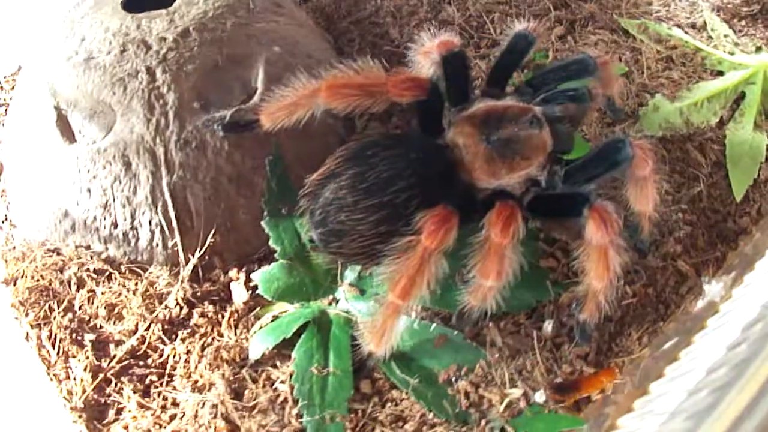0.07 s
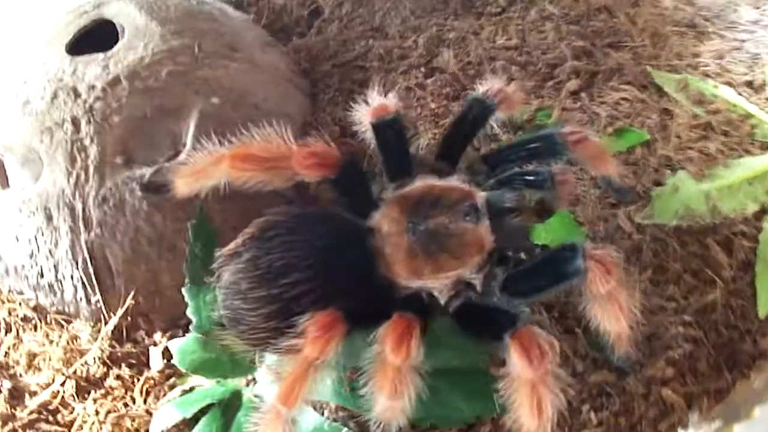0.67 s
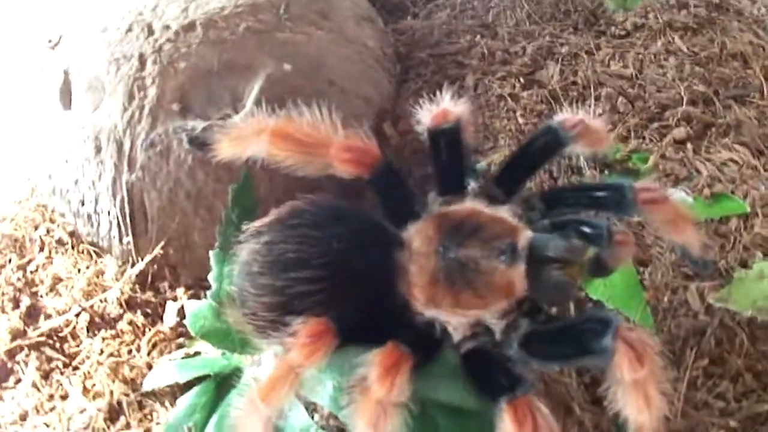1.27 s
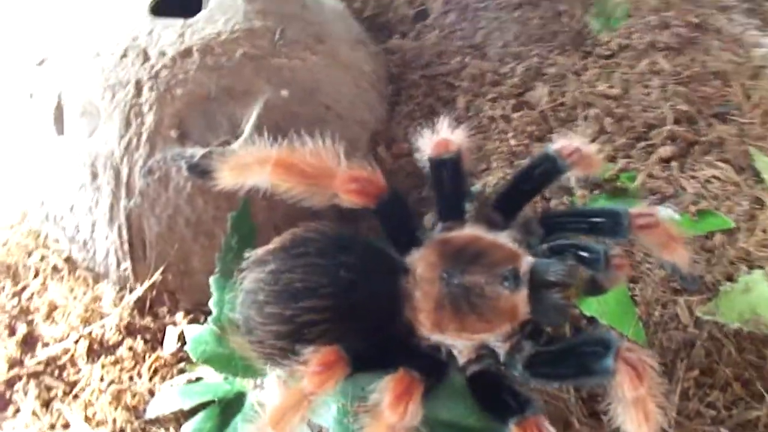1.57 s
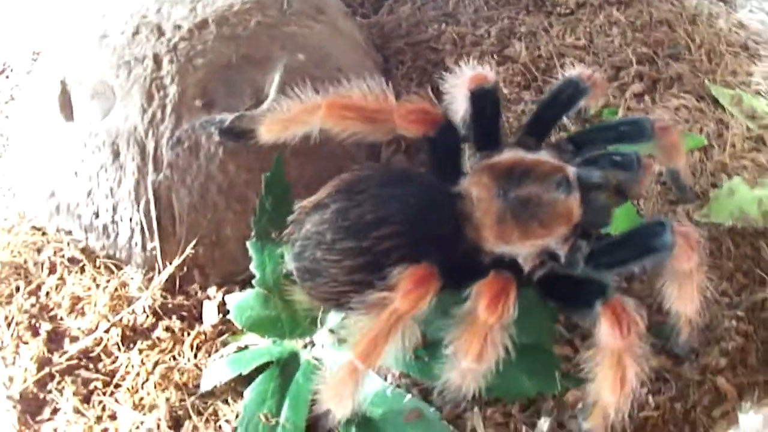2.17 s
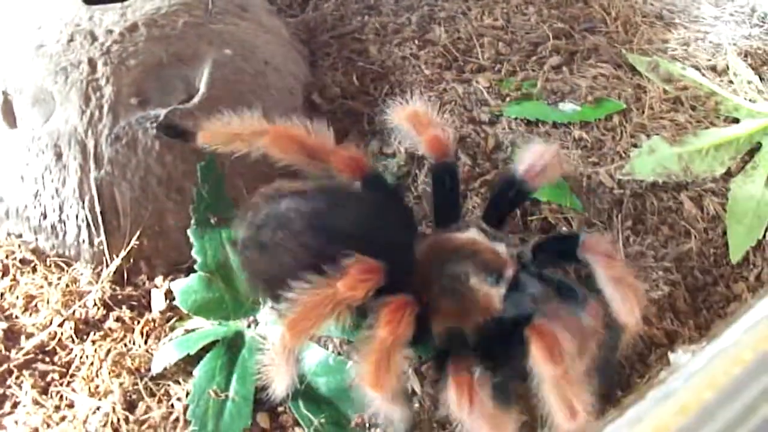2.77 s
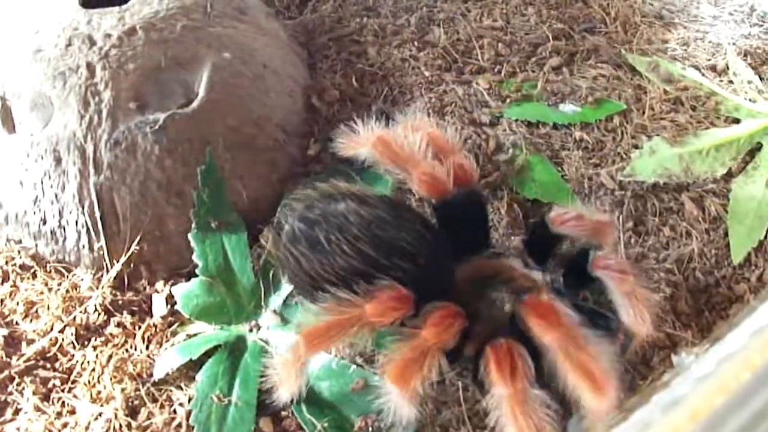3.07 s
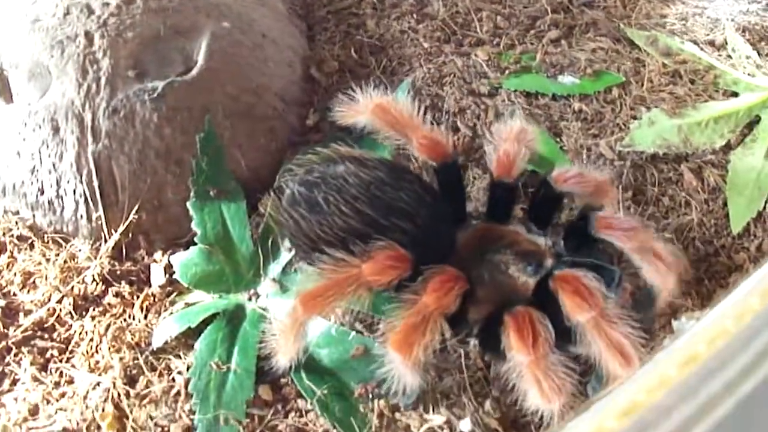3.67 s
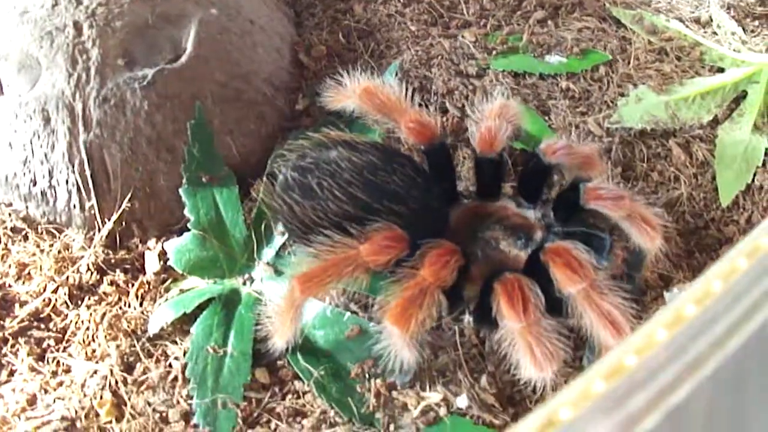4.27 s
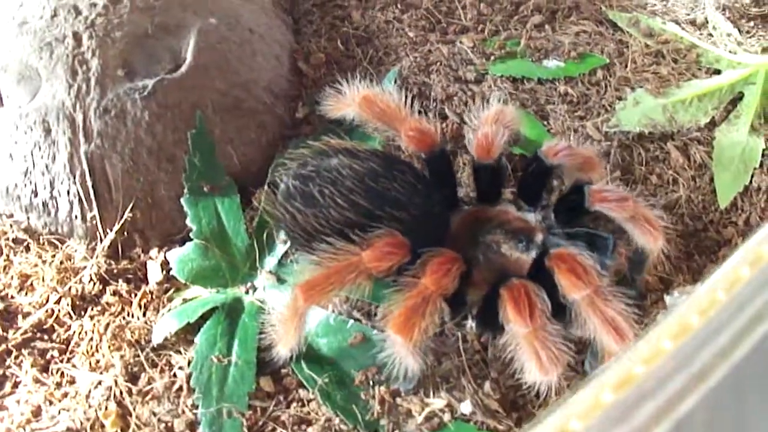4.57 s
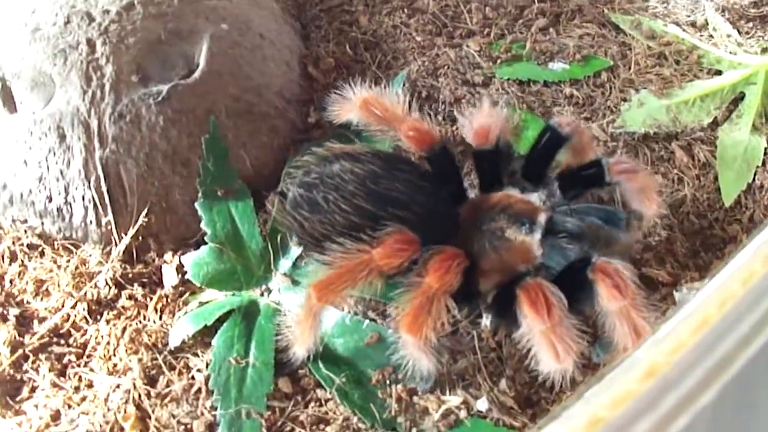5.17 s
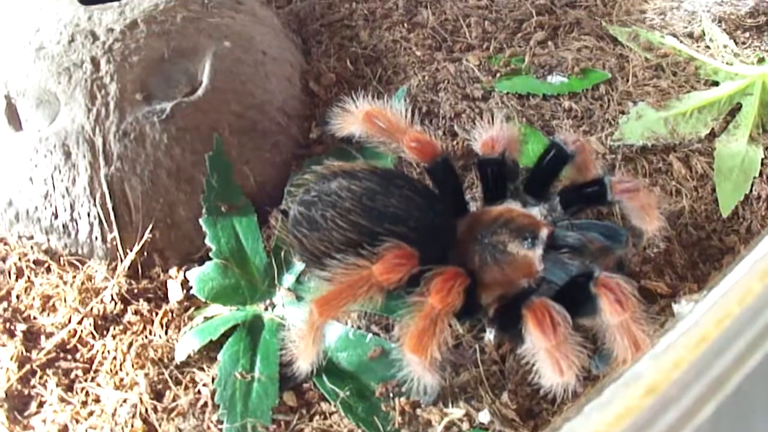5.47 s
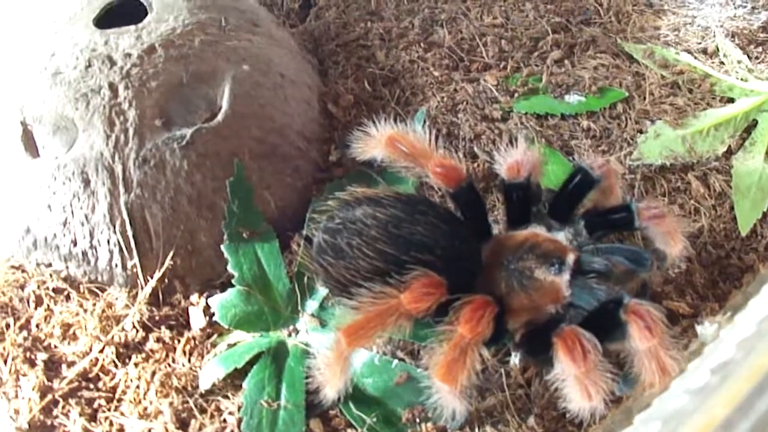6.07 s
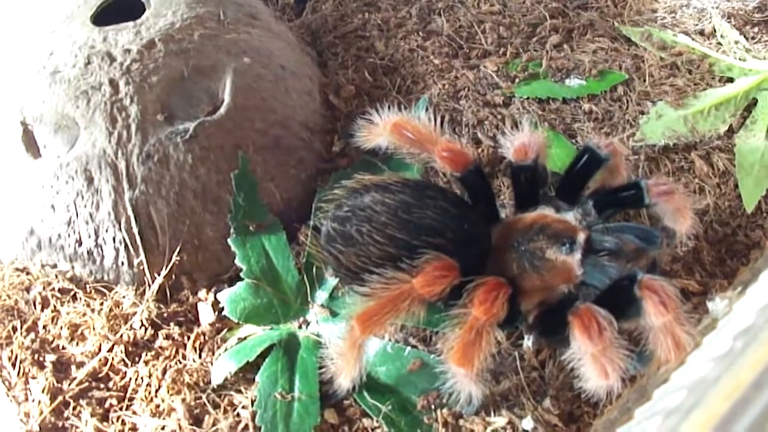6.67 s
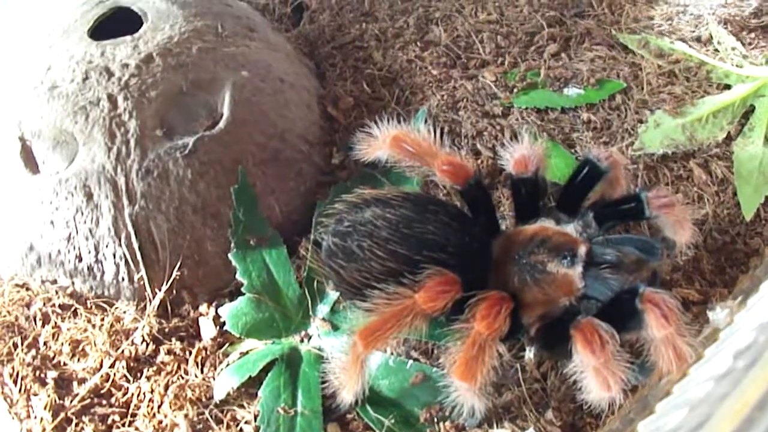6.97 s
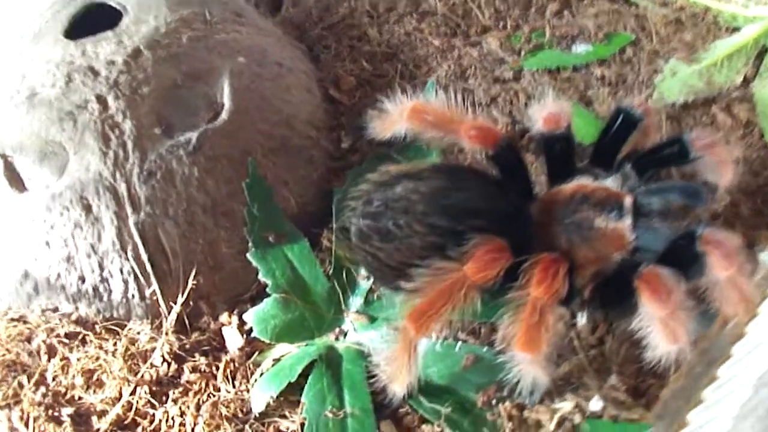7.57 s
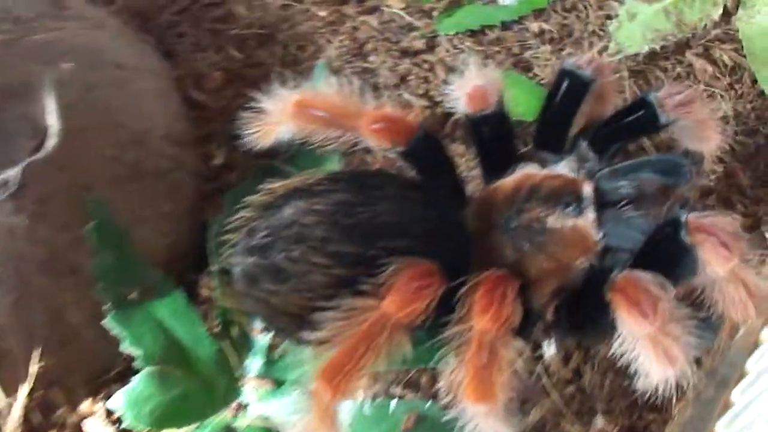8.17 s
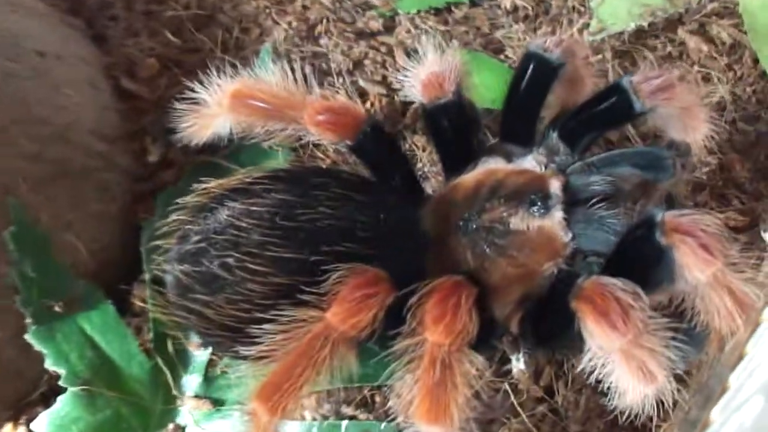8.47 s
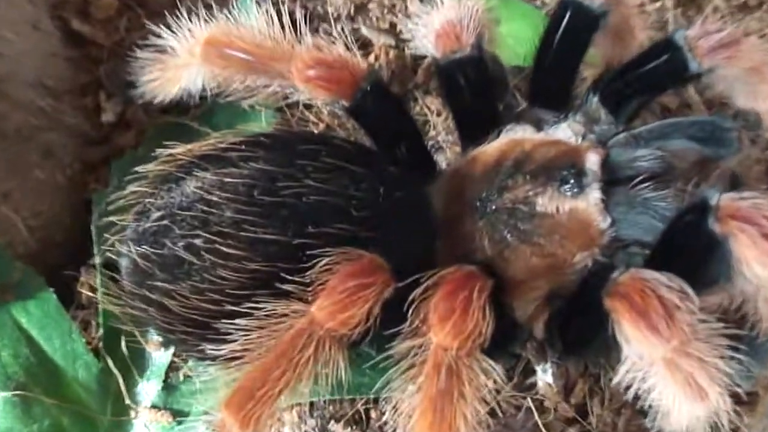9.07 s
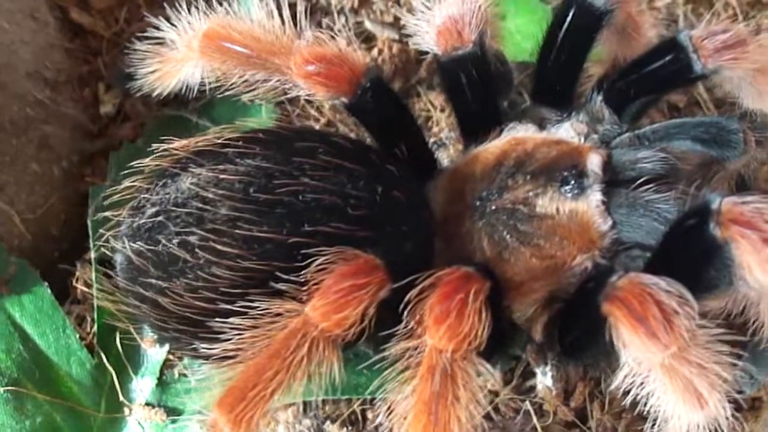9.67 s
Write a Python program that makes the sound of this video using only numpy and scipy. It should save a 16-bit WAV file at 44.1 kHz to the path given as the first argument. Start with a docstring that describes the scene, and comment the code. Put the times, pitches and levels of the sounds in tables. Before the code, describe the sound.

A quiet room hisses steadily with a faint fan whine and tiny ticks from a focusing lens. Handled plastic clicks and snaps now and then, and a tarantula's steps faintly rustle dry bedding twice. Later a fingertip lands on the camera with a soft bump, squeaks and slides along it. After it lifts comes the loudest snap. Everything is close to the microphone.

```python
"""A quiet room, heard from a hand-held camera above a tarantula's tank. From the start, air hisses,
a fan whines faintly and the lens ticks as it focuses. Handled plastic clicks, snaps and knocks on and
off, and near 3 and 5 seconds the spider's steps rustle the dry bedding. At 6.8 seconds a fingertip
lands on the camera, squeaks and slides slowly along it. It lifts off just after 9 seconds; then come
the loudest snap and a last hunt for focus."""
import sys
import numpy as np
from scipy import signal
from scipy.fft import rfft, irfft, next_fast_len
from scipy.io import wavfile
from scipy.ndimage import uniform_filter1d, map_coordinates

SR = 44100
rng = np.random.default_rng(int(sys.argv[2]) if len(sys.argv) > 2 else 0)


def master_out(mix):
    """Clip the mix to full scale and print it as 16-bit PCM to the path in sys.argv[1]."""
    frames = np.transpose(np.atleast_2d(mix))
    ceiling = np.clip(frames, -1, 1)
    pcm = np.round(ceiling * 32767).astype(np.int16)
    wavfile.write(sys.argv[1], SR, pcm)


N = 437913
LAND_S, LIFT_S = 6.8, 9.15  # the fingertip is on the camera between these times


def amp(db):
    """Turn decibels (dB) into a number to multiply by."""
    return 10 ** (np.asarray(db) / 20)


def unit(x):
    """Scale x to an average (rms) level of 1."""
    return x / np.sqrt(np.mean(x ** 2) + 1e-20)


def wobble(rate):
    """A smooth curve through `rate` random values a second."""
    return map_coordinates(rng.standard_normal(int(N * rate / SR) + 4), [np.arange(N) * rate / SR])


def filtered(x, response):
    """Multiply each frequency in x by response(hz)."""
    size = next_fast_len(len(x) + 8192)
    return irfft(rfft(x, size) * response(np.fft.rfftfreq(size, 1 / SR)), size)[:len(x)]


def coloured(x, points):
    """Shape the tone of x along a curve of (Hz, dB) points, then scale it to level 1."""
    points_hz, db = np.transpose(points)
    return unit(filtered(x, lambda hz: amp(np.interp(np.log(hz + 1), np.log(points_hz), db))))


def resonate(x, modes):
    """Let x ring an object at its natural pitches (modes), every second one flipped in sign."""
    def response(hz):
        return sum((-1) ** k * amp(db) * 1j * hz * width / (pitch ** 2 - hz ** 2 + 1j * hz * width)
                   for k, (pitch, width, db) in enumerate(modes))
    return filtered(x, response)


def band(x, low_hz, high_hz):
    """Keep what lies between two frequencies, with gentle edges."""
    edges = np.clip([low_hz, max(high_hz, low_hz * 1.1)], 20, SR * .48)
    return signal.sosfilt(signal.butter(2, edges, "band", fs=SR, output="sos"), x)


def no_bass(x, cut_hz):
    """Cut the lows: small plastic parts give off almost no bass."""
    return signal.sosfilt(signal.butter(2, cut_hz, "high", fs=SR, output="sos"), x)


def grains(rate, spread_db):
    """Tiny slips of very unequal size at random moments, about `rate` a second."""
    happens = rng.random(N) < rate / SR
    return happens * rng.standard_normal(N) * amp(spread_db * rng.standard_normal(N))


def burst(fade, smooth_hz=300):
    """A dying cluster of tiny slips, about equally strong at all frequencies."""
    spectrum = rfft(fade * rng.standard_normal(len(fade)), 2 * len(fade))
    power = uniform_filter1d(abs(spectrum) ** 2, max(1, round(smooth_hz * 2 * len(fade) / SR)))
    return irfft(spectrum / np.sqrt(abs(power) + 1e-12))[:len(fade)] * fade ** 0.2


def swells(rows):
    """A smooth rise and fall for each row: middle in seconds, level in dB, half length in seconds."""
    t = np.arange(N) / SR
    return sum(amp(db) * np.exp(-.5 * np.minimum(((t - s) / half) ** 2, 100)) for s, db, half in rows)


def room(rumble_db=-55.5, hiss_db=-55.0, drift_db=.25):
    """Moving air: a soft rumble under a broad hiss, both nearly steady."""
    # The tone of the rumble and of the hiss. Each row: frequency in Hz, relative level in dB.
    rumble_tone = [(20, -26), (40, -22), (75, -13.5), (120, -7.5), (180, -3), (300, -0.5), (520, 0.5),
                   (720, -0.24), (950, -3), (1300, -8.5), (2200, -33)]
    hiss_tone = [(500, -26.5), (900, -7.5), (1100, -2.5), (1330, -0.5), (1520, -1), (1750, -0.5),
                 (2100, -3), (3000, -5.5), (3800, -8), (4900, -9), (5700, -10.5), (7000, -12.5),
                 (8500, -13), (11000, -17.5)]
    rumble = coloured(rng.standard_normal(N), rumble_tone) * amp(rumble_db + drift_db * wobble(2.88))
    hiss = coloured(rng.standard_normal(N), hiss_tone) * amp(hiss_db + drift_db * wobble(2.1))
    return rumble + hiss


def fan(speed_spread=0.00205, waver_db=2.5, start_gain_db=2.1, fade_db_per_s=0.27):
    """Faint motor tones share one unsteady speed, and each wavers in loudness on its own."""
    # The motor's tones. Each row: pitch in Hz, relative level in dB.
    tones = [(99, -83), (296, -76), (1238, -77.5), (1413, -68.5), (1678, -76), (1766, -77.5), (1942, -82)]
    motor_time = np.cumsum(1 + speed_spread * wobble(8)) / SR
    whine = sum(np.sqrt(2) * amp(db + waver_db * wobble(5)) * np.sin(2 * np.pi * hz * motor_time)
                for hz, db in tones)
    return whine * amp(start_gain_db - fade_db_per_s * np.arange(N) / SR)  # fades as the camera moves


def focus(steps_per_s=30, first_s=0.0058, idle_db=-56.5, scatter_db=3.5):
    """The lens makes tiny regular steps, harder while it hunts for focus; each ticks in its mount."""
    # The hunts. Each row: start in seconds, end in seconds, typical peak of a step in dB.
    hunts = [(1.95, 2.4, -55), (4.05, 4.6, -53), (9.5, 9.93, -49.5)]
    # How the mount rings. Each row: pitch in Hz, width in Hz, relative level in dB.
    mount_modes = [(4130, 140, -2.5), (4940, 450, -6)]
    times = np.arange(first_s, N / SR - .01, 1 / steps_per_s)
    hunting = [(times > start) & (times < end) for start, end, _ in hunts]
    level_db = np.select(hunting, [db for _, _, db in hunts], idle_db)
    steps = np.zeros(N)
    steps[(times * SR).astype(int)] = amp(level_db + scatter_db * rng.standard_normal(len(times)))
    tick = resonate(signal.unit_impulse(SR // 20), mount_modes)
    return signal.fftconvolve(steps, tick / abs(tick).max())[:N]


def clicks(direct=0.33, rise_s=0.00016, overtone_ratio=1.39, overtone_db=-25, rebound_db=-10.5):
    """A light touch rings the plastic briefly, while bursts of tiny slips crack through its shell."""
    # The touches. Each row: start in seconds, ring pitch in Hz, ring level in dB, crack level in dB,
    # the crack's low and high edges in Hz.
    touches = [ (0.0252, 2000, -44, -40, 1310, 6000), (0.438, 3870, -36, -45, 3000, 10000),
               (2.871, 6100, -34, -34.5, 6500, 11500), (3.9985, 1200, -28.5, -41, 1100, 1500),
               (5.0203, 6100, -36, -38, 6000, 11500), (5.2245, 4700, -48, -41, 4000, 7000),
               (6.7885, 2700, -37, -42, 1810, 3800), (6.7954, 1070, -32.5, -36, 800, 2600),
               (8.2235, 3100, -42, -45, 2500, 4500), (8.264, 487, -32.5, -35.5, 760, 2700),
               (9.0044, 2620, -32, -39, 900, 9000), (9.01, 2600, -30, -36, 1000, 7000),
               (9.0248, 2600, -48, -39, 1090, 6000), (9.04, 2600, -34, -41, 900, 5500)]
    # How the plastic shell rings. Each row: pitch in Hz, width in Hz, relative level in dB.
    shell_modes = [(480, 860, -9), (1220, 400, 6.5), (1830, 430, 6.5), (2300, 520, 7), (3100, 710, 3),
                   (3900, 120, 6), (4550, 650, -1), (6500, 1100, 1.5), (10300, 920, -7)]
    t = np.arange(SR // 10) / SR
    rise = 1 - np.exp(-t / rise_s)
    out = np.zeros(N + SR)
    for start, ring_hz, ring_db, crack_db, low_hz, high_hz in touches:
        # A t60 is the seconds taken to fade by 60 dB; higher sounds die sooner.
        ring_t60 = 0.016 * (1000 / ring_hz) ** 0.49
        crack_t60 = 0.016 * (1000 / low_hz) ** 0.61
        phase = 2 * np.pi * ring_hz * t
        ring = np.sin(phase) + amp(overtone_db) * np.sin(overtone_ratio * phase)
        out[round(start * SR):][:len(t)] += rise * amp(ring_db - 60 * t / ring_t60) * ring
        fade = rise * amp(-60 * t / crack_t60)
        rebound_s = start + 0.24 * crack_t60  # every touch strikes again, more softly
        for at, db in [(start, crack_db), (rebound_s, crack_db + rebound_db)]:
            slips = burst(fade)
            crack = band(direct * slips + resonate(slips, shell_modes), low_hz, high_hz)
            crack *= np.linalg.norm(fade) / np.linalg.norm(crack)
            out[round(at * SR):][:len(t)] += crack * amp(db)
    return no_bass(out[:N], cut_hz=220)


def walls(x, echo_db=-21.0, t60=0.05):
    """The small room answers x with a faint, short echo."""
    t = np.arange(SR // 2) / SR
    tail = band(rng.standard_normal(len(t)), 400, 6200) * amp(-60 * t / t60)
    return amp(echo_db) * signal.fftconvolve(x, tail / np.linalg.norm(tail))[:N]


def brief_hisses(band_ratio=1.6):
    """Tiny slips swell into brief high hisses: dry scuffs, and at 0.728 s the hollow snap's tail."""
    # The hisses. Each row: middle in seconds, level in dB, half length in seconds, centre in Hz.
    hisses = [(.288, -53, .002, 7500), (.728, -56, 0.011, 6000), (2.102, -57, .002, 5000),
              (2.395, -51, .002, 6000), (2.54, -57, .003, 5000), (2.735, -57.5, .022, 6200),
              (2.787, -51, .01, 6800), (2.8125, -51.5, .003, 6500), (2.98, -55, 0.013, 7000),
              (3.375, -54.5, .002, 7000), (3.459, -53, .0018, 6000), (4.995, -56, .003, 6000),
              (5.263, -61, .011, 5500), (6.123, -55.5, .007, 4200), (6.618, -59, .025, 4500)]
    slips = grains(rate=8800, spread_db=5.5)
    return sum(unit(band(slips, hz / band_ratio, hz * band_ratio)) * swells([(middle, db, half)])
               for middle, db, half, hz in hisses)


def snaps(noise_t60=0.0097, noise_band_hz=(750, 9500)):
    """Strained plastic gives way: the spot rings at its own pitches, with a tiny spit of noise."""
    # The snaps, with their small ticks before and rebounds after. Each row: start in seconds, spot,
    # gain in dB, rise time in seconds, extra gain for the noise in dB.
    breaks = [ (0.7084, 'hollow', -29, .0006, -1), (1.7191, 'dry', -27, .00012, -10),
              (1.7205, 'dry', -28.1, .0013, -2), (2.7162, 'low', -16, .0031, -23),
              (2.7258, 'low', -29, .0017, -11), (2.7316, 'low', -20, .0055, -14),
              (5.9792, 'bright', -24.1, .0045, -11), (5.98217, 'bright', -35.5, 0.0002, 5),
              (5.98395, 'bright', -17, 0.00062, -11), (5.9855, 'bright', -28, .0015, -15),
              (6.80025, 'dull', -22, .0001, -15), (6.80372, 'dull', -25, .0011, -19),
              (9.3106, 'sharp', -30.5, .0002, -4), (9.3175, 'sharp', -10, 0.00066, -11.5),
              (9.32137, 'sharp', -21.5, .00025, -2), (9.3246, 'sharp', -24.5, .0006, -11)]
    # How six spots of the plastic ring, each named for its sound.
    # Each row: pitch in Hz, relative level in dB, seconds to fade by 60 dB.
    hollow = [(1190, -2, .018), (1570, -3.5, .032), (3280, 1.5, 0.007), (4170, -5, 0.0096),
              (4900, -8, 0.0098), (5550, -5, 0.0087), (6822, 1, 0.0061), (8034, -8, .009)]
    dry = [(1030, -8, 0.027), (1544, -4, .004), (1862, -2.5, 0.013), (2350, -9, 0.0057), (2718, -7, .0085),
           (2937, -12, 0.011), (3556, -4, .0065), (4570, -3.5, .012), (5016, -0.5, 0.0046),
           (6025, -4.5, 0.0039), (7226, -9, .0047), (10316, -14, .006)]
    low = [(480, -18.5, 0.044), (738, -19.5, 0.047), (964, -3, .0116), (1440, -21, .022)]
    bright = [(1756, -5, 0.0072), (1730, -19.4, 0.0259), (2360, 0.7, 0.0077), (2520, -37, 0.0994),
              (3004, -28, 0.0765), (3558, -6.5, 0.0123), (4858, -2.7, 0.0077), (5595, -16.6, 0.0103),
              (5950, 6.7, 0.0029), (7184, -7, 0.0034), (8549, -13.9, 0.0041), (11100, -6, 0.0032)]
    dull = [(417, -14, 0.017), (805, -8, .0038), (1195, -10, 0.017), (1550, -3.5, .015), (1900, -4, 0.012),
            (2420, -18, .09), (2778, -11, .012), (3330, -6.5, 0.0084), (4300, -9, 0.0036),
            (5400, -9.5, .005), (7375, -9, .0025)]
    sharp = [(400, -27, 0.016), (930, -25, 0.011), (1290, -6, 0.0083), (1510, -17, .026), (1702, 2, .0062),
             (2170, -5.7, .0067), (2465, -12, 0.015), (3050, -6, 0.0076), (4000, -17.5, 0.018),
             (4497, -13, .011), (5000, -11, .008), (6350, -13, .009), (6930, -18, 0.0056),
             (10400, -16.5, .005)]
    spots = dict(hollow=hollow, dry=dry, low=low, bright=bright, dull=dull, sharp=sharp)
    t = np.arange(SR // 10) / SR
    out = np.zeros(N + SR)
    for start, spot, db, rise_s, noise_db in breaks:
        ring = sum((-1) ** k * amp(level - 60 * t / t60) * np.sin(2 * np.pi * hz * t)
                   for k, (hz, level, t60) in enumerate(spots[spot]))
        fade = amp(noise_db - 60 * t / noise_t60)
        noise = fade * band(rng.standard_normal(len(t)), *noise_band_hz)
        out[round(start * SR):][:len(t)] += amp(db) * (1 - np.exp(-t / rise_s)) * (ring + noise)
    return no_bass(out[:N], cut_hz=240)


def bedding(clump_db=2.0):
    """Dry fibres crackle in small clumps while the spider moves."""
    # The tone of the fibres. Each row: frequency in Hz, relative level in dB.
    fibre_tone = [(800, -22), (2000, -2), (3500, 3.5), (6000, 0.5), (10000, 0), (11000, -13)]
    # The spider's moves. Each row: middle in seconds, level in dB, half length in seconds.
    moves = [(2.85, -59.5, 0.29), (5.02, -63, 0.22)]
    fibres = coloured(grains(rate=2500, spread_db=3.5), fibre_tone)
    return unit(fibres * amp(clump_db * wobble(60))) * swells(moves)


def thud(level_db=-40.5, t60=0.13):
    """The soft pad of the finger lands on the camera's case with a dull puff."""
    since = np.arange(N) / SR - LAND_S
    fade = (since > 0) * amp(level_db - 60 * abs(since) / t60)
    return fade * unit(band(rng.standard_normal(N), low_hz=300, high_hz=2600))


def fingertip(grip_s=0.015, let_go_s=0.054, squeak_db=-57, relax_db_per_s=48, slide_db=-59):
    """Skin squeaks until its fresh grip relaxes, and its many tiny slips ring the case as it slides."""
    # The squeak's glide. Each row: time in seconds, pitch in Hz.
    glide = [(6.805, 6200), (6.823, 7800), (6.853, 6260), (6.9, 7140)]
    # How the rubbed case rings. Each row: pitch in Hz, width in Hz, relative level in dB.
    case_modes = [(2450, 410, -7), (3055, 150, -1.5), (3340, 170, -1.5), (4010, 260, -8), (4900, 500, -15),
                  (6140, 430, -14.5), (7200, 280, -14.5), (10000, 740, -19)]
    t = np.arange(N) / SR
    since = np.maximum(t - LAND_S, 0)
    contact = np.clip(since / grip_s, 0, 1) * np.clip((LIFT_S - t) / let_go_s + .5, 0, 1)
    rub = unit(resonate(grains(rate=7000, spread_db=1.0), case_modes))
    rub = map_coordinates(rub, [np.cumsum(1 + .012 * wobble(4))])  # changing pressure bends the pitch
    squeak_hz = np.interp(t, *np.transpose(glide)) + 350 * wobble(2000)  # jitter roughens the tone
    squeak = np.sin(2 * np.pi * np.cumsum(squeak_hz) / SR) * amp(squeak_db - relax_db_per_s * since)
    press_db = 1.9 * np.exp(-.5 * ((t - 8.15) / 0.21) ** 2)  # the finger bears down midway
    get_going = 1 - np.exp(-since / 0.05)
    slide = rub * amp(slide_db + press_db) * get_going
    uneven_db = 0.5 * wobble(25)
    return contact * (slide + squeak) * amp(uneven_db)


def drags(ring_hz=2620, ring_width_hz=200, ring_db=-2):
    """Where the skin catches and drags harder, a broad scrape swells and rings the case."""
    # The catches. Each row: peak time in seconds, level in dB, rise and fall times in seconds.
    catches = [(6.819, -50, .008, 0.011), (8.29, -55.5, .045, .17), (9.003, -45.5, .022, .006)]
    t = np.arange(N) / SR
    force = sum(amp(db) * np.exp(-np.maximum((peak - t) / rise, (t - peak) / fall).clip(0, 20))
                for peak, db, rise, fall in catches)
    slips = grains(rate=14000, spread_db=4)
    scrape = unit(band(slips, low_hz=600, high_hz=8000))
    ring = unit(resonate(slips, [(ring_hz, ring_width_hz, 0)]))
    return force * unit(scrape + amp(ring_db) * ring)


def scene():
    """Everything is close to one microphone; only the snaps and clicks get an echo."""
    plastic = snaps() + clicks()
    finger = thud() + fingertip() + drags()
    mix = room() + fan() + plastic + walls(plastic) + bedding() + brief_hisses() + finger + focus()
    return mix[None]


def record(dry):
    """The camera keeps nothing above its treble limit."""
    def treble_cut(hz, limit_hz=11130, edge_width_hz=200):
        return np.clip((limit_hz - hz) / edge_width_hz + .5, 0, 1)
    return np.array([filtered(channel, treble_cut) for channel in dry])


dry = scene()
out = record(dry)
master_out(out)
```